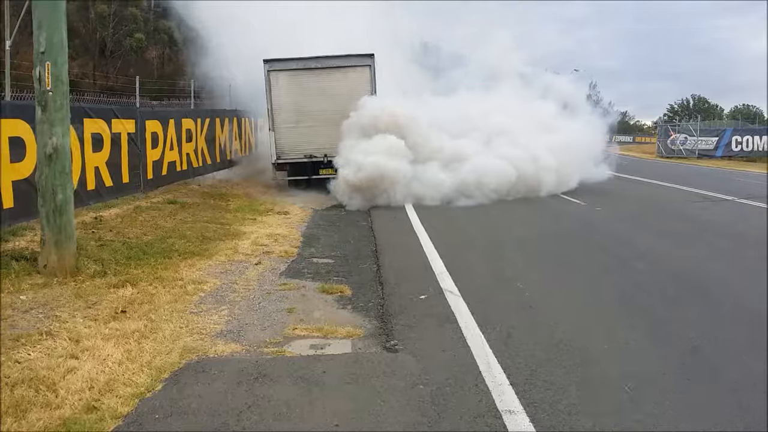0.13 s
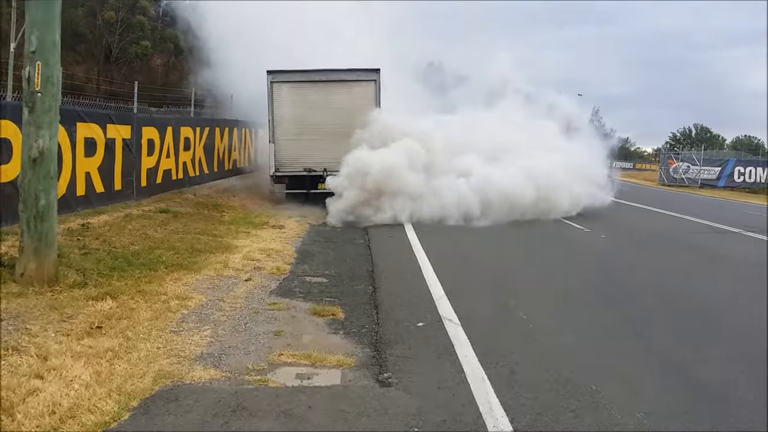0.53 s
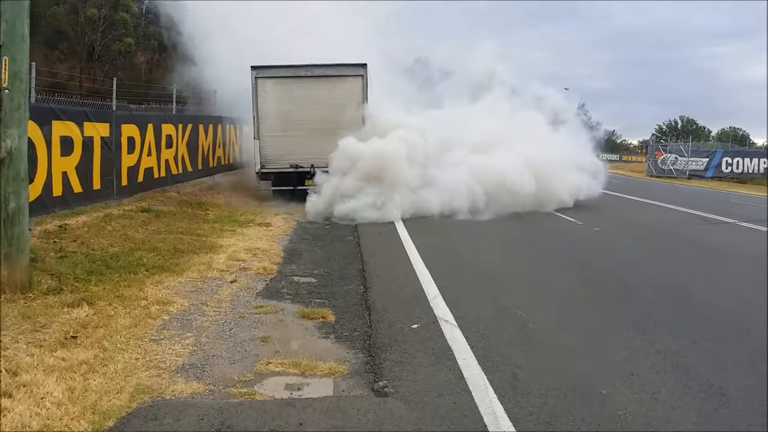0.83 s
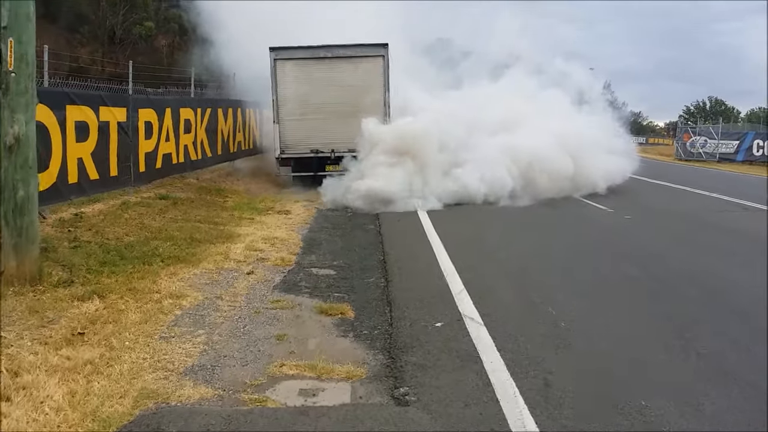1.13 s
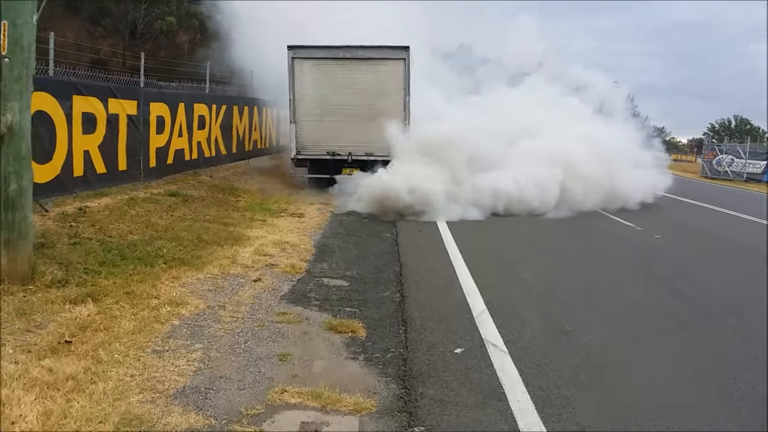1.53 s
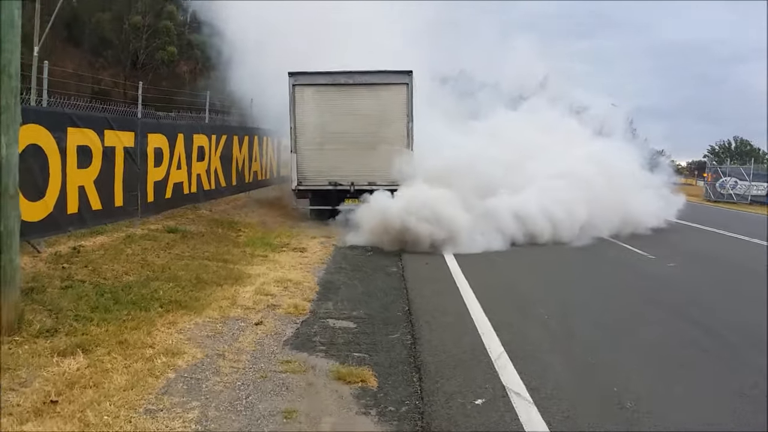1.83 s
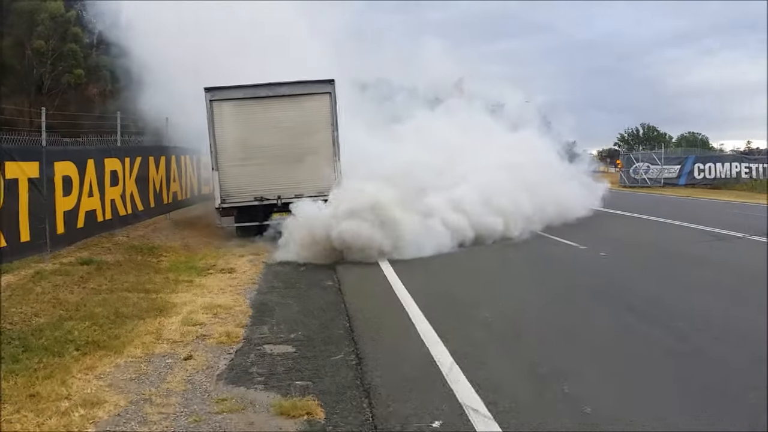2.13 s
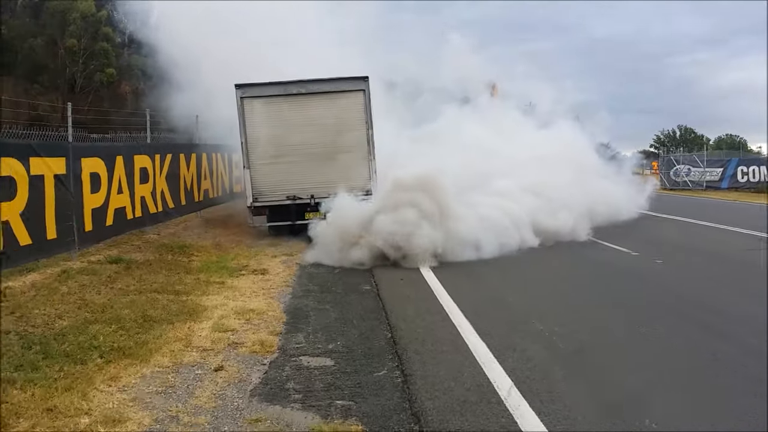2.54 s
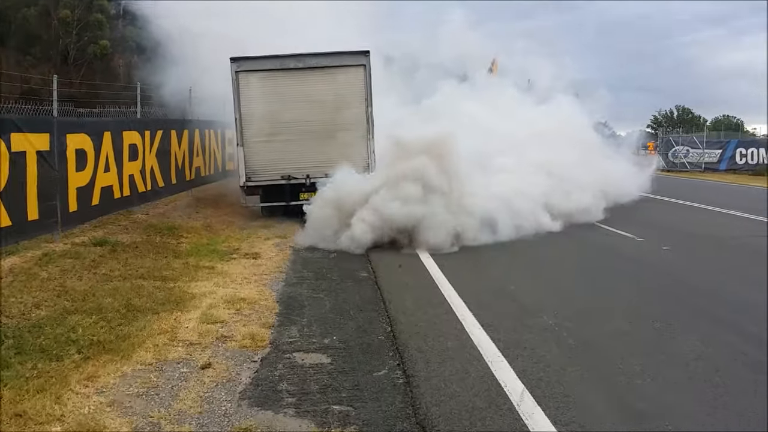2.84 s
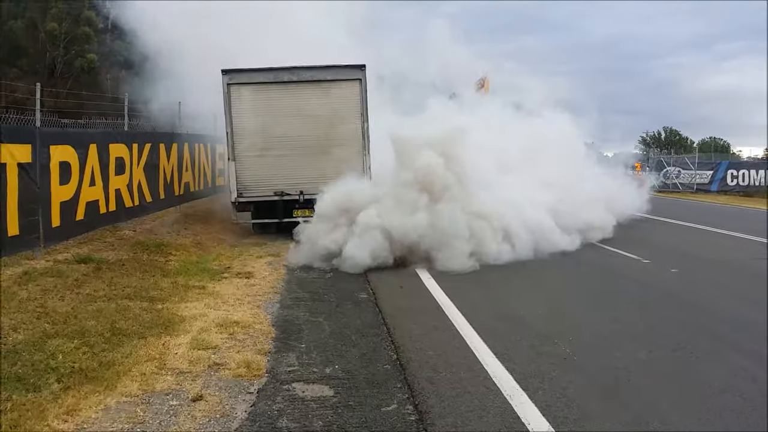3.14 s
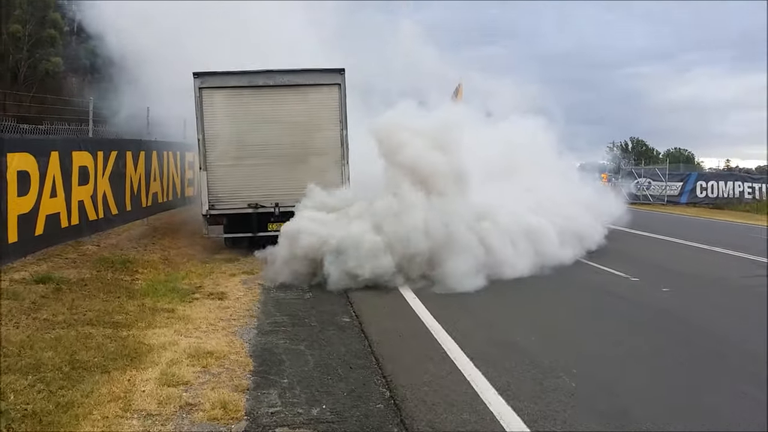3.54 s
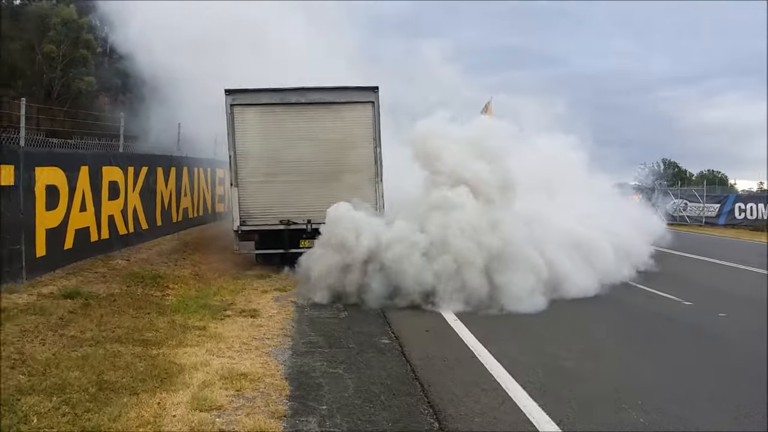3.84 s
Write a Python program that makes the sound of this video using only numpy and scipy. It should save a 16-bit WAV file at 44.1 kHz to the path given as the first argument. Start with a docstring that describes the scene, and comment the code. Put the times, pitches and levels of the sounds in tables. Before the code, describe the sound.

A truck's diesel engine drones loudly on an outdoor track, fading in after a brief silence. Raspy exhaust and rushing gas mix with the whistling hiss of spinning tyres, and the roar holds to the end.

```python
"""A diesel box truck does a standing burnout, its engine held at the governor.
After a short silence the sound fades in: the exhaust booms at the firing rate, with a rasp of higher
crank orders on top. Gas rushes out in puffs while the spinning wheels hum and the tyres hiss and sing
on the asphalt. A little past halfway the exhaust changes colour, one faint tick follows,
and the roar holds to the end."""
import sys
import numpy as np
from scipy import signal
from scipy.fft import rfft, irfft, next_fast_len
from scipy.io import wavfile
from scipy.ndimage import uniform_filter1d, map_coordinates

SR = 44100
rng = np.random.default_rng(int(sys.argv[2]) if len(sys.argv) > 2 else 0)


def transcribe(u):
    """Save the signal u as a 16-bit wav file named by the first command-line argument.

    u: samples, shape (n,) or (channels, n), limited to [-1, 1]; the rate is SR.
    q: integer samples, one column per channel.
    """
    v = np.clip(np.atleast_2d(u).T, -1, 1)
    q = np.round(v * 32767).astype(np.int16)
    wavfile.write(sys.argv[1], SR, q)


N = 176400
TIME_S = np.arange(N) / SR
COLOUR_CHANGE_S, COLOUR_GLIDE_S = 2.35, 0.11
RIGHT_LEAD_S = 4e-5


# Body of the exhaust, before and after the colour change: crank_order, level_db
DRONE_EARLY = [(1, -56), (2, -34.5), (3, -30), (4, -0.5), (5, -19.5), (6, -15.5), (7, -24.5), (8, -19),
               (9, -31), (10, -39.5), (11, -34), (12, -28.5), (13, -25), (14, -24.5), (15, -33.5),
               (16, -36), (17, -24), (18, -18), (19, -24.5), (20, -17.5), (21, -21.5), (22, -24),
               (23, -23.5), (24, -29)]
DRONE_LATE = [(1, -54), (2, -40), (3, -33), (4, 0.5), (5, -20.5), (6, -16.5), (7, -26.5), (8, -26),
              (9, -43), (10, -41.5), (11, -32), (12, -24), (13, -39), (14, -23), (15, -43), (16, -33.5),
              (17, -31), (18, -20.5), (19, -27), (20, -18.5), (21, -27), (22, -27), (23, -34), (24, -30)]

def exhaust_drone(turns, level_db=-16, firing_order=4, pipe_q=17):
    """The firing note and its neighbours ring the pipe in step for a sharp attack; higher orders scatter."""
    late = crossfade(COLOUR_CHANGE_S, COLOUR_GLIDE_S)
    drone = np.zeros((2, N))
    for (order, early_db), (_, late_db) in zip(DRONE_EARLY, DRONE_LATE):
        detuning = order / firing_order - firing_order / order
        pipe_phase = -np.arctan(pipe_q * detuning) / (2 * np.pi)
        phase = pipe_phase if order < 9 else rng.random()
        gain = amp(level_db + early_db) * (1 - late) + amp(level_db + late_db) * late
        waver = 0.02 if order == firing_order else 0.16
        drone += partial(order * turns, gain, waver, phase)
    return drone


# Grit above the drone, early and late, one entry per crank order from the 25th up: level_db
RASP_EARLY = [-23, -21, -17, -30, -15, -8, -14, -6.5, -1.5, -1, -3, -11, -8.5, -2, -2.5, -11.5, -18, -6,
              -16, -19, -26, -31, -14.5, -17, -25, -15, -16, -5, -6.5, -34, -13, -11, -16, -11, -18, -24,
              -21, -19, -20.5, -16, -40, -24, -16, -35, -31, -44, -21, -18, -15, -26]
RASP_LATE = [-42, -11, -16, -7.5, -13.5, -10, -3.5, -5.5, -5, 0.5, -5.5, -7.5, -18, -13, -7.5, -18.5, -24,
             -12, -10, -17, -34, -26, -13, -28, -28, -13.5, -19, -12.5, -15, -26, -23, -14, -17, -15.5,
             -16.5, -18, -18, -26, -16.5, -13, -16.5, -30, -32, -31, -27, -31, -27, -30, -27, -30]
# Fader ride on the rasp: time_s, gain_db
RASP_RIDE = [(0.7, -1.5), (1.2, 0.5), (1.8, 0.5), (2.6, -0.4), (3.1, 0.5), (3.55, -1), (3.95, -0.1)]

def exhaust_rasp(turns, level_db=-34):
    """High crank orders, shaped by exhaust resonances that shift at the colour change."""
    late = crossfade(COLOUR_CHANGE_S, COLOUR_GLIDE_S)
    rasp = np.zeros((2, N))
    for order, (early_db, late_db) in enumerate(zip(RASP_EARLY, RASP_LATE), start=25):
        gain = amp(early_db) * (1 - late) + amp(late_db) * late
        rasp += partial(order * turns, gain, waver=0.26, phase=rng.random())
    return amp(level_db + curve(RASP_RIDE)) * rasp


# Revs, creeping up slightly: time_s, speed_turns_per_s
CRANK_SPEED = [(0.5, 32.1), (0.74, 32.2), (1.0, 32.42), (1.25, 32.34), (1.5, 32.36), (1.8, 32.42),
               (2.18, 32.5), (2.4, 32.68), (2.78, 32.6), (3.6, 32.62), (3.8, 32.74), (3.98, 32.76)]

def crank_turns():
    """Running count of turns of the governed crank, with a slight jitter."""
    return np.cumsum(curve(CRANK_SPEED)) / SR + 0.0004 * wobble(25)


# Rhythm of the puffs within one turn: position_turns, strength
PUFFS = [(.21, 0.96), (.38, 0.87), (.72, 1.22), (.9, 0.47)]

def gas_flow(turns, width_turns=0.073, steady_flow=0.54):
    """Four uneven puffs leave the pipe every turn, on top of a steady stream."""
    flow = steady_flow
    for position, strength in PUFFS:
        offset = (turns - position + 0.5) % 1 - 0.5
        flow += strength * np.exp(-0.5 * (offset / width_turns) ** 2)
    return unit(flow)


# Tone of the rushing gas: frequency_hz, level_db
GAS_SPECTRUM = [(25, -28), (50, -10), (75, -3.5), (110, 0.5), (180, 3), (240, -2), (320, -8), (365, -9),
                (400, 6), (440, -2), (500, -0.5), (640, -1), (850, -6.5), (1130, -2), (1450, -7.5),
                (1900, -8), (2600, -12.5), (4000, -24), (8000, -58)]
# Its stereo width: frequency_hz, left_right_correlation
GAS_CORRELATION = [(100, 0.75), (600, 1), (1300, 0.91), (2500, 0.18), (4000, 0.59)]
# Its midrange EQ, before and after the colour change: frequency_hz, gain_db
GAS_EQ_EARLY = [(850, 0), (920, -1.5), (990, -8), (1120, 0.5), (1270, 2.5), (1400, -1), (1470, 0),
                (1570, -2), (1700, 4), (1850, 0), (2100, 1), (2350, 2.5), (2800, -1.5)]
GAS_EQ_LATE = [(850, -0.5), (940, 1.5), (1070, 2), (1200, -5), (1330, 0), (1420, -0.5), (1600, 2.5),
               (1780, -6), (1950, 0), (2250, -1), (2800, -1.5)]

def gas_rush(flow, level_db=-28):
    """Turbulent exhaust noise, pulsed by the puffs; its colour shifts along with the rasp."""
    noise = amp(level_db) * flow * stereo_noise(GAS_SPECTRUM, GAS_CORRELATION, ENGINE_PAN)
    early = filtered(noise, lambda hz: amp(along(GAS_EQ_EARLY, hz)))
    late = filtered(noise, lambda hz: amp(along(GAS_EQ_LATE, hz)))
    return early + (late - early) * crossfade(COLOUR_CHANGE_S, COLOUR_GLIDE_S)


# Passing peaks in the rasp and gas: start_s, end_s, centre_hz, width_hz, boost_db
RESONANCES = [(0.3, 0.78, 2290, 130, 8.5), (0.3, 1.25, 1760, 110, 3), (1.1, 1.45, 2330, 120, 2.5),
              (1.565, 1.882, 2000, 100, 6), (1.51, 1.8, 1350, 110, 3.5), (2.284, 2.877, 1650, 70, 4.5),
              (2.52, 2.92, 2100, 100, 7), (2.86, 3.25, 1412, 60, 4.5), (2.899, 3.85, 1920, 70, 5.5),
              (3.3, 4.303, 1526, 60, 7), (3.73, 4.3, 1660, 110, 9.5), (3.25, 4.298, 1152, 80, 3)]

def add_resonances(roar, glide_s=0.18):
    """Narrow resonances come and go in the roar."""
    ringing = np.zeros((2, N))
    for start_s, end_s, centre_hz, width_hz, boost_db in RESONANCES:
        swell = crossfade(start_s, glide_s) - crossfade(end_s, glide_s)
        band = filtered(roar, lambda hz: peak(hz, centre_hz, width_hz))
        ringing += (amp(boost_db) - 1) * swell * band
    return roar + ringing


# Tone of the broad tyre hiss: frequency_hz, level_db
HISS_SPECTRUM = [(1500, -22), (2500, -6.5), (3100, -6.5), (4000, -1.5), (5000, 2), (6500, 1.5),
                 (7300, -4.5), (8300, -5.5), (9800, -11.5), (11000, -19), (11700, -17), (13000, -30),
                 (14500, -46)]
# Its stereo width: frequency_hz, left_right_correlation
HISS_CORRELATION = [(2500, 0.4), (6000, 0.49), (9000, 0.16), (12000, 0.0)]
# Its pan: frequency_hz, left_minus_right_db
HISS_PAN = [(2000, -18), (3100, -6), (4000, -2), (5200, 1.5), (6500, -0.5), (7500, -6), (9500, -6.5),
            (11000, -21), (13000, -15)]

def tyres(turns, flow, hiss_db=-28, flutter_db=0.97):
    """Rubber hisses and sings on the asphalt, fluttering and surging with every turn of the engine."""
    hiss = amp(hiss_db) * stereo_noise(HISS_SPECTRUM, HISS_CORRELATION, HISS_PAN)
    rubber = hiss + rubber_singing()
    flutter = amp(flutter_db * wobble(110))
    surge = 1 + 0.062 * np.cos(2 * np.pi * turns)
    return rubber * flutter * surge * flow ** 0.11


# Whistling bands in the hiss: start_s, end_s, pitch_hz, width_hz, level_db, left_minus_right_db
SINGING_BANDS = [(0.37, 1.03, 6600, 800, -32, 9), (0.4, 0.8, 4700, 250, -38, 10),
                 (0.4, 1.05, 3160, 450, -42, 7), (0.37, 2.01, 4680, 420, -35.5, -10),
                 (0.4, 1.5, 6130, 400, -39, -2), (1.05, 1.42, 6400, 550, -37, 4),
                 (1.36, 2.42, 5270, 420, -37, 18), (1.94, 2.9, 5400, 260, -37, 14),
                 (2.5, 2.8, 5700, 450, -35, 15), (2.45, 3.28, 5240, 310, -33, 9),
                 (0.62, 0.97, 4660, 300, -39, -1), (0.4, 1.89, 8270, 350, -44, -16),
                 (2.45, 3.32, 4700, 330, -39, 8), (2.04, 3.8, 5910, 170, -38, -12),
                 (2.3, 2.95, 6400, 270, -39, -6), (2.8, 4.2, 5600, 350, -39.5, -4),
                 (1.997, 3.75, 7100, 270, -38.5, -14), (3.6, 4.8, 5500, 150, -35.5, 12)]

def rubber_singing(glide_s=0.12):
    """Slipping rubber sings in narrow bands of noise that swell and die away."""
    singing = np.zeros((2, N))
    for start_s, end_s, pitch_hz, width_hz, level_db, pan_db in SINGING_BANDS:
        band = filtered(rng.standard_normal(N), lambda hz: peak(hz, pitch_hz, width_hz) * right_lead(hz))
        panned = unit(band * amp([[pan_db / 2], [-pan_db / 2]]))
        swell = crossfade(start_s, glide_s) * (1 - crossfade(end_s, glide_s))
        singing += amp(level_db) * swell * panned
    return singing


def wheel_hum(pitch_hz=80.8, level_db=-38):
    """The spinning wheels hum unsteadily under the firing note."""
    return partial(pitch_hz * TIME_S, amp(level_db), waver=0.076, phase=rng.random())


def grit_tick(start_s=2.5, level_db=-17, t60_s=0.016):
    """A small bright tick, perhaps grit flung by a tyre."""
    age_s = TIME_S - start_s
    decay = amp(level_db - 60 * np.abs(age_s) / t60_s) * (age_s > 0)
    burst = decay * rng.standard_normal((2, N))
    return filtered(burst, lambda hz: peak(hz, centre_hz=7000, width_hz=8500))


# Pan of the exhaust and the wheel hum: frequency_hz, left_minus_right_db
ENGINE_PAN = [(130, -2.5), (350, -2.5), (700, -1.5), (1200, 0.5), (2000, 2), (3000, -4.5)]

def partial(cycles, gain, waver, phase, spread_s=6.4e-5):
    """One stereo tone following a running count of cycles, wavering in level and phase."""
    mean_hz = cycles[-1] * SR / N
    drift = 1 + waver * (wobble(13) + 1j * wobble(13))
    tone = gain * drift * np.exp(2j * np.pi * (cycles + phase))
    lag_rad = np.pi * mean_hz * (RIGHT_LEAD_S + spread_s * rng.normal())
    sides = pan_gains(ENGINE_PAN, mean_hz) * np.exp([-1j * lag_rad, 1j * lag_rad])
    return np.real(sides[:, None] * tone) * np.sqrt(2 / (1 + 2 * waver ** 2))


def stereo_noise(spectrum, correlation, pan, patchy_db=1):
    """Shaped noise of rms 1, with patches of random gain across time and frequency."""
    def mid_side_gains(hz):
        angle = np.arccos(np.clip(along(correlation, hz), -1, 1)) / 2
        return amp(along(spectrum, hz)) * [np.cos(angle), np.sin(angle)]

    bins = signal.stft(rng.standard_normal((2, N)), nperseg=512)[2]
    patches = uniform_filter1d(rng.standard_normal(bins.shape[1:]), size=5, axis=0)
    patches = uniform_filter1d(patches, size=18, axis=1)
    noise = signal.istft(bins * amp(patchy_db * unit(patches)), nperseg=512)[1][:, :N]
    mid, side = filtered(noise, mid_side_gains)
    left_right = np.array([mid + side, mid - side])
    return unit(filtered(left_right, lambda hz: pan_gains(pan, hz) * right_lead(hz)))


def pan_gains(pan, hz):
    """Left and right gains at constant power."""
    pan_db = along(pan, hz)
    gains = amp([pan_db / 2, -pan_db / 2])
    return gains / np.sqrt(np.mean(gains ** 2, axis=0))


def right_lead(hz):
    """The sound reaches the right side a moment before the left."""
    return np.exp(1j * np.pi * RIGHT_LEAD_S * np.array([-hz, hz]))


def peak(hz, centre_hz, width_hz):
    """The gain of one resonance, 1 at its centre."""
    return 1 / (1 + ((hz - centre_hz) / width_hz) ** 2) ** 2


def filtered(x, response):
    """Pass x through a frequency response."""
    size = next_fast_len(N + SR // 2)
    return irfft(rfft(x, size) * response(np.fft.rfftfreq(size, 1 / SR)), size)[..., :N]


def crossfade(centre_s, glide_s):
    """A smooth step from 0 to 1."""
    return 0.5 + 0.5 * np.tanh(2 * (TIME_S - centre_s) / glide_s)


def wobble(knots_per_s):
    """A smooth random curve."""
    times_s = np.linspace(0, N / SR, 2001)
    values = map_coordinates(rng.standard_normal(1024), [times_s * knots_per_s], mode="wrap")
    return curve(np.c_[times_s, values])


def curve(points):
    """Read (time_s, value) points at every sample."""
    return np.interp(TIME_S, *np.transpose(points))


def along(points, hz):
    """Read (frequency_hz, value) points on a log axis."""
    points_hz, values = np.transpose(points)
    return np.interp(np.log(hz + 1), np.log(points_hz + 1), values)


def amp(db):
    """Decibels to gain."""
    return 10 ** (np.asarray(db) / 20)


def unit(x):
    """Scale to rms 1."""
    return x / np.sqrt(np.mean(x ** 2) + 1e-20)


def scene():
    """One crank drives the exhaust and pulses the tyres; the hum and the tick sit underneath."""
    turns = crank_turns()
    flow = gas_flow(turns)
    drone = exhaust_drone(turns)
    rasp = exhaust_rasp(turns) * flow ** 0.18  # throbs lightly with the puffs
    roar = add_resonances(rasp + gas_rush(flow))
    return drone + roar + wheel_hum() + grit_tick() + tyres(turns, flow)


def record(dry):
    """Fade in from silence and cut the very top of the treble."""
    start_s, fade_s, top_hz = 0.41, 0.29, 14600
    fade = np.clip((TIME_S - start_s) / fade_s, 0, 1) ** 1.015
    return filtered(dry * fade, lambda hz: hz < top_hz)


dry = scene()
out = record(dry)
transcribe(out)
```